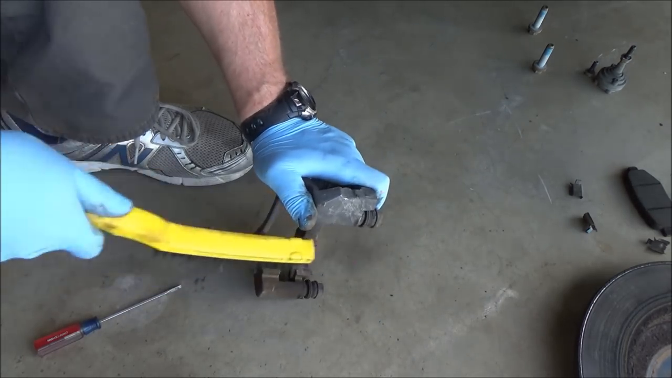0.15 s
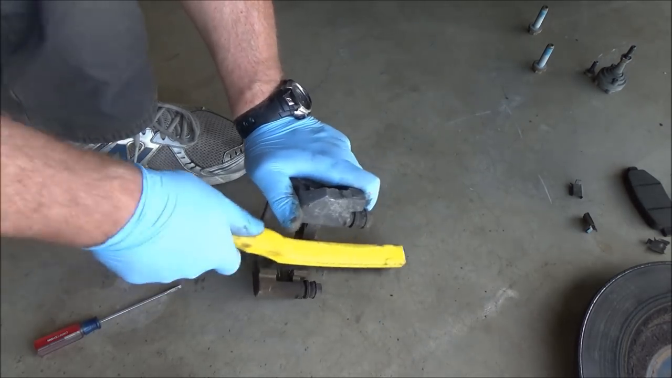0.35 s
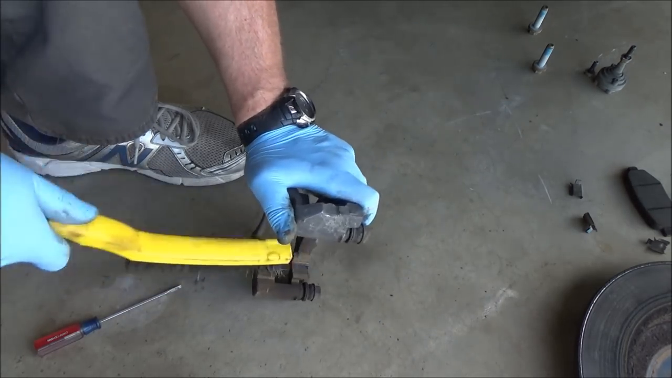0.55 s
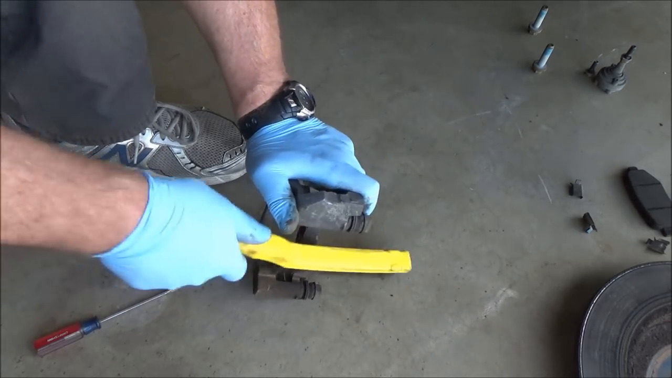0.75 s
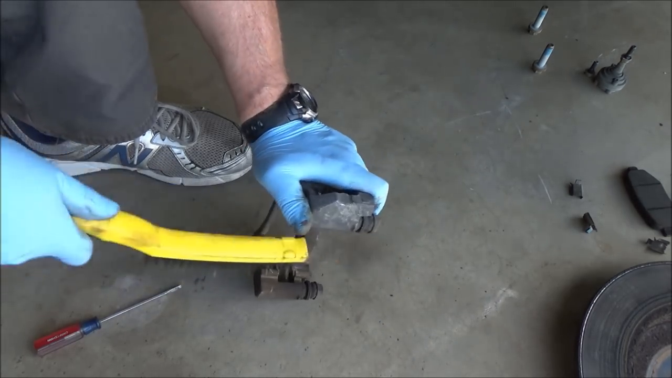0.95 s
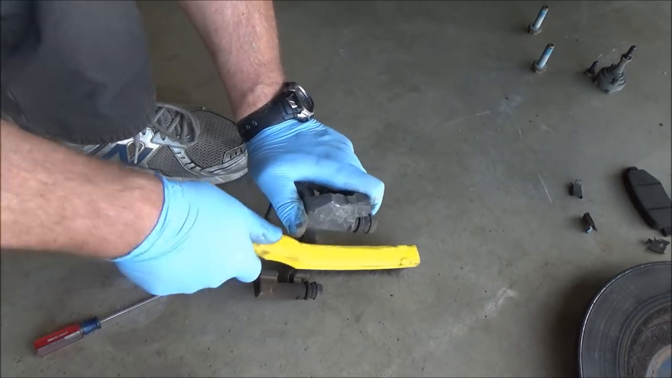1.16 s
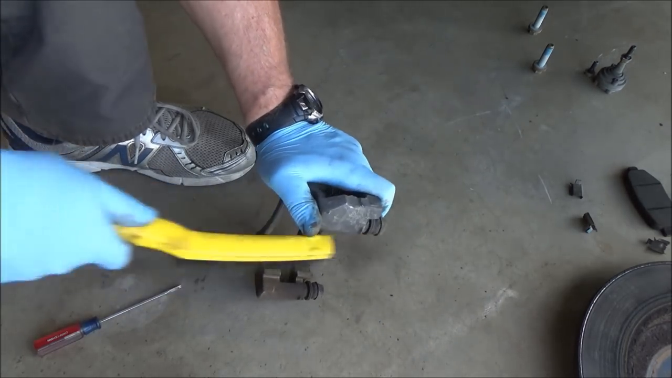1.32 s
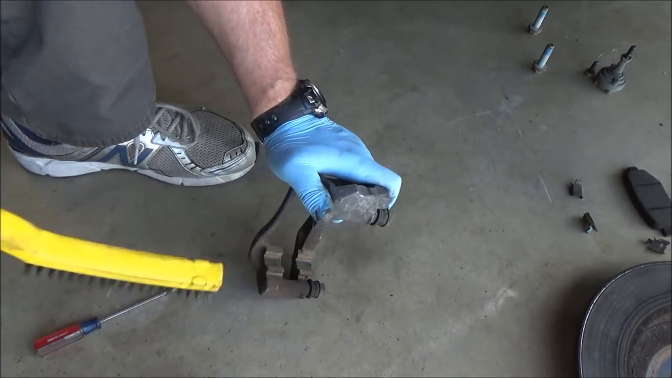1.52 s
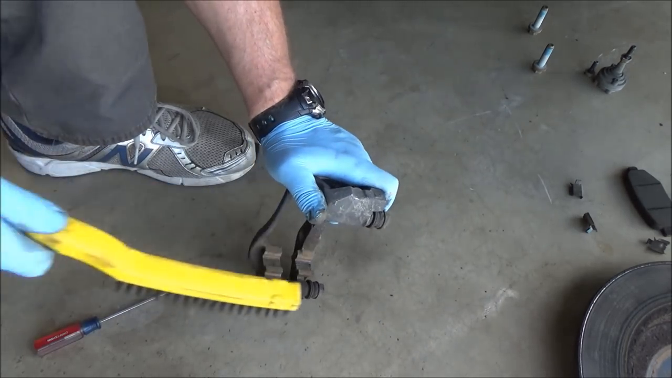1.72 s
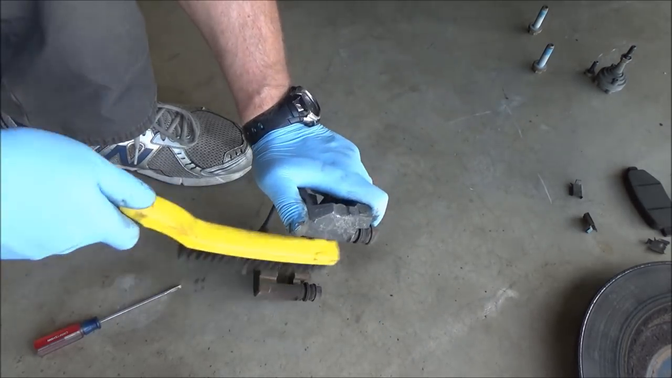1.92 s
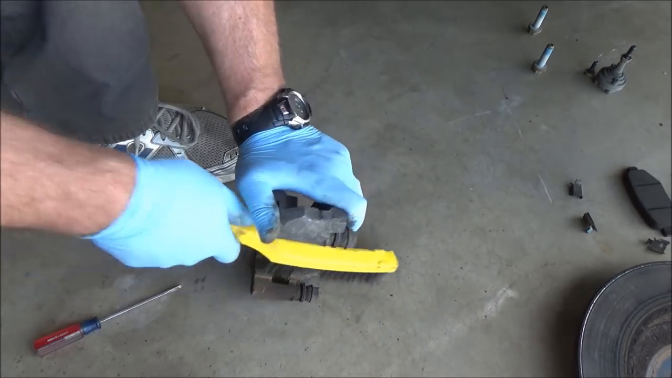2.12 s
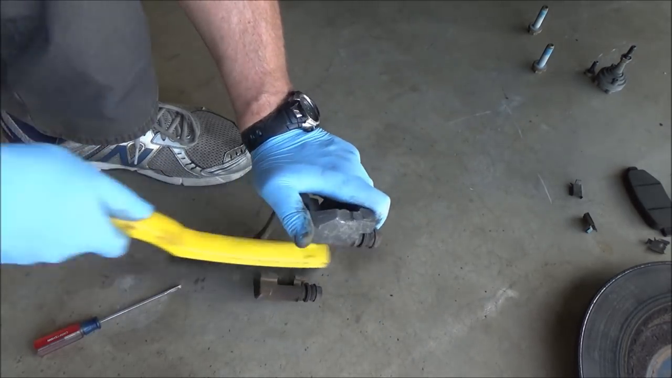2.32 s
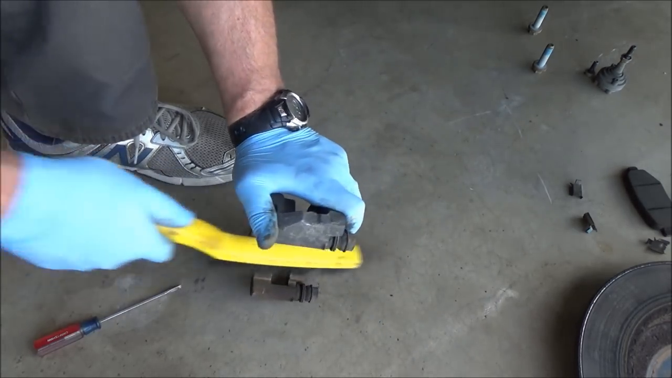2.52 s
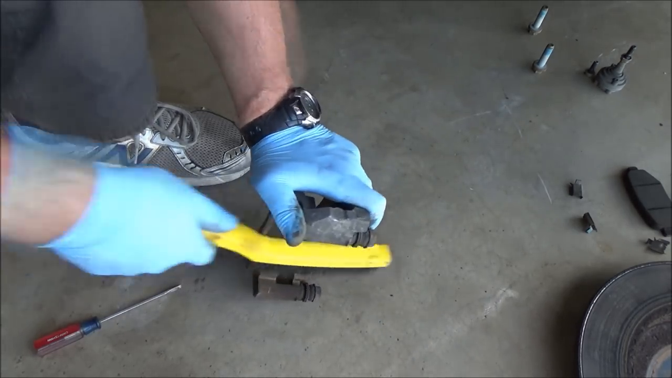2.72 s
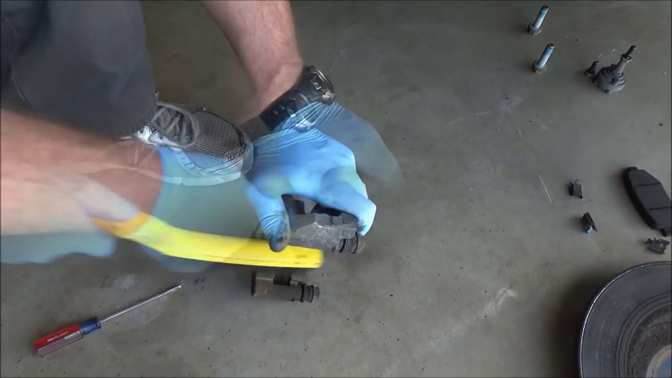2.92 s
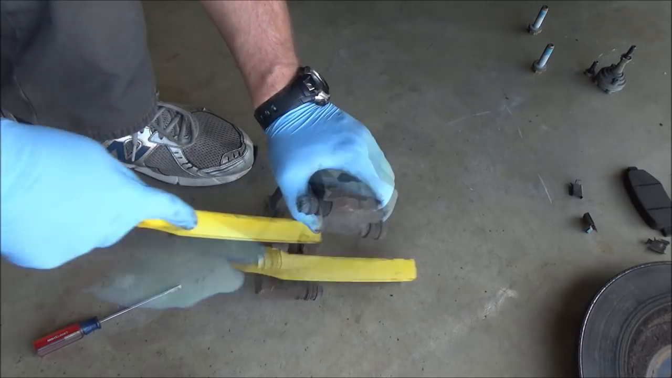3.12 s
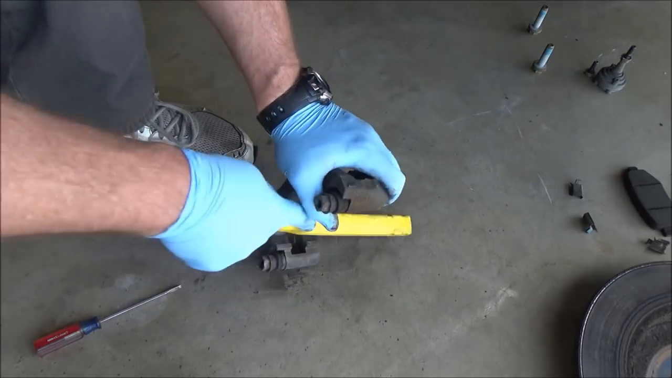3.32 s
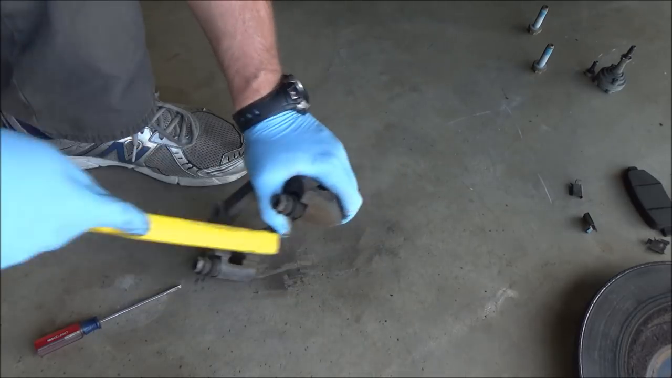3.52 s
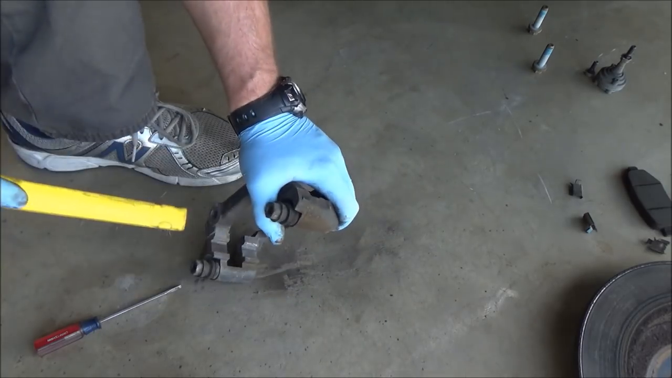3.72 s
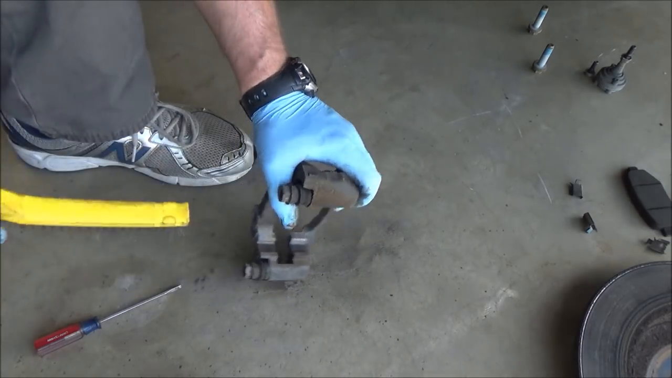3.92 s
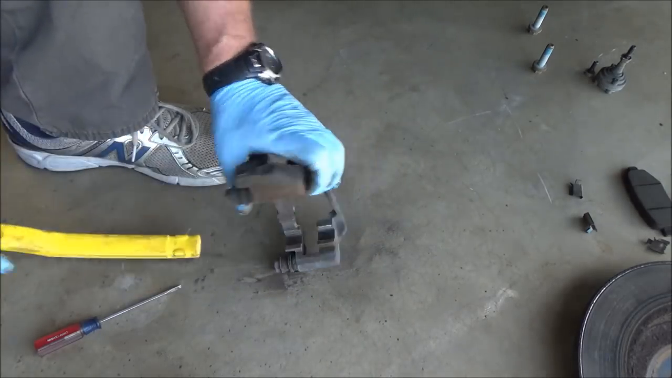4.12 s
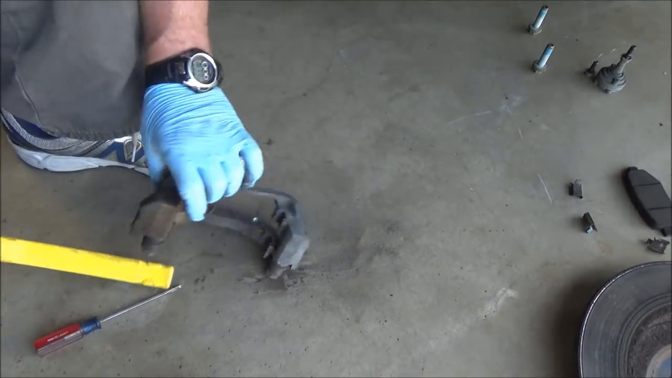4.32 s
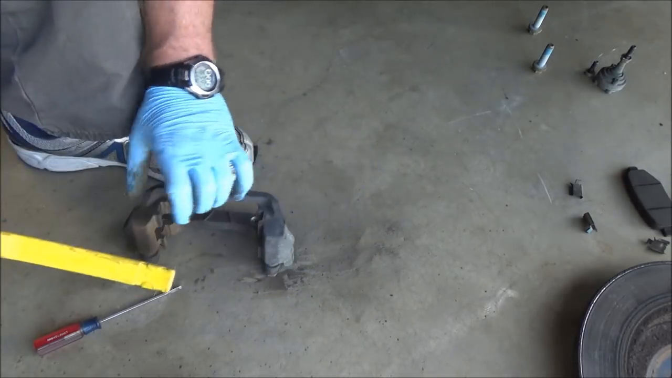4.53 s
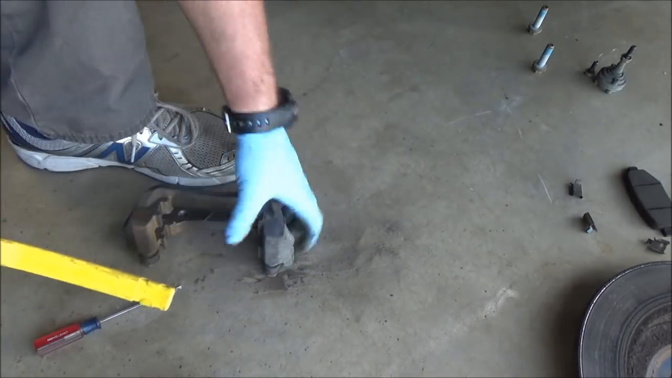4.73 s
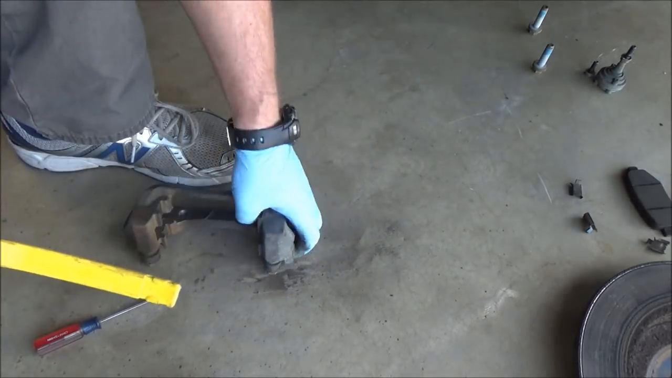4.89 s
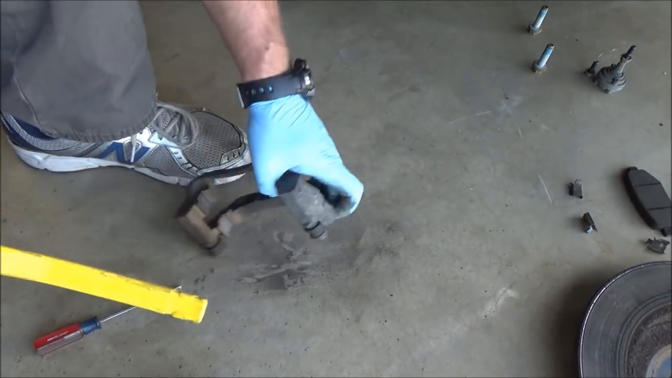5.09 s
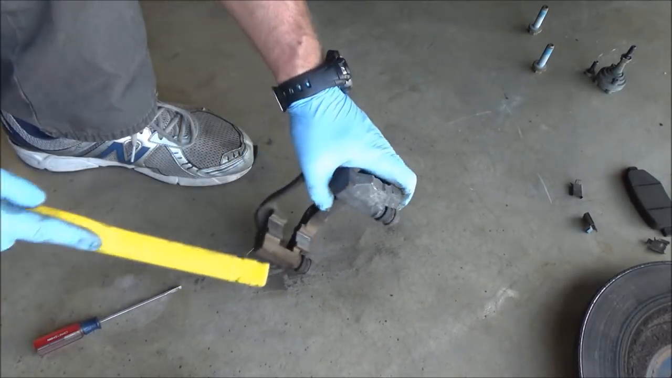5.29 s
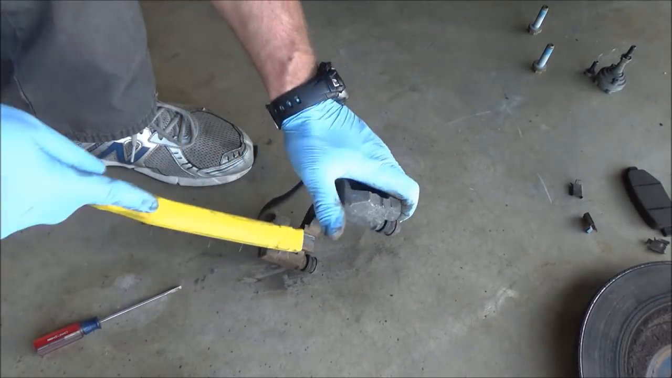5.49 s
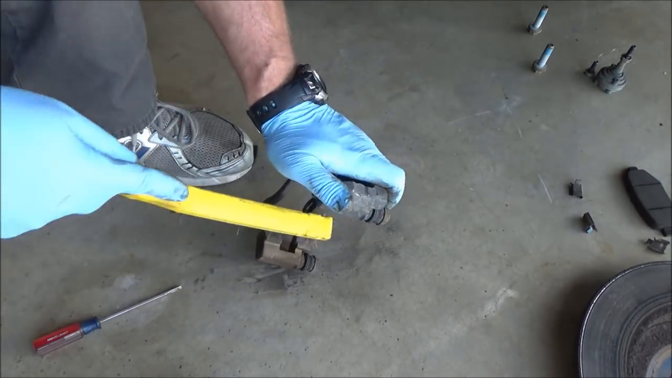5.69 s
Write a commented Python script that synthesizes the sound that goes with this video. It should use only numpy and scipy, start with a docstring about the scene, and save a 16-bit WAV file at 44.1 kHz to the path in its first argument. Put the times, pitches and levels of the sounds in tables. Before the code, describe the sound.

A wire brush scrubs a metal part in quick scratchy strokes, then the part clanks and scrapes on a concrete floor.

```python
"""A steel wire brush scrubs a rusty cast bracket, which rocks on a concrete garage floor in a gloved hand.
The wire tips catch on the rust and spring free, ringing. After a pause, more strokes start at 2 seconds.
From 3.7 seconds the bracket is dragged, laid over, regripped and stood up: iron clanks, grit ticks,
and the rubber glove rubs and squeaks. Near the end a faint cricket grows louder. It comes in through
the open door, along with the traffic that rumbles all the way through."""
import sys
import numpy as np
from scipy import signal
from scipy.fft import rfft, irfft, next_fast_len
from scipy.io import wavfile

SR = 44100
rng = np.random.default_rng(int(sys.argv[2]) if len(sys.argv) > 2 else 0)


def unload_wav(signal):
    """Save mono or channel-first audio to the path in sys.argv[1] as 16-bit WAV at rate SR, clipped to [-1, 1]."""
    wavfile.write(
        sys.argv[1],
        SR,
        np.round(np.clip(np.atleast_2d(signal).T, -1, 1) * 32767).astype(np.int16),
    )


N = 253575

# Brush strokes, pull and push by turns. Each row: start and end in seconds, level in dB once biting,
# before letting go and at the turn, then the middle ring and the rasp in dB above that level.
STROKES = [(0.0, 0.218, -25, -25, -38.5, -7.5, -17), (0.215, 0.406, -22.5, -25.5, -33, -6.5, -16),
           (0.403, 0.607, -24.5, -26, -41.5, -7, -18), (0.599, 0.802, -23.5, -25, -38, -5.5, -17),
           (0.808, .99, -24, -25, -40.5, -6, -17), (0.985, 1.201, -24.5, -23.5, -38.5, -6, -16.5),
           (1.226, 1.473, -24, -27, -48, -5, -15.5), (2.02, 2.231, -25, -25.5, -37.5, -5.5, -12.5),
           (2.236, 2.457, -23.5, -21.5, -30.5, -5.5, -16.5), (2.472, 2.695, -20.5, -21.5, -33, -6.5, -17),
           (2.7, 2.918, -21.5, -21, -35, -5.5, -16), (2.914, 3.126, -20, -22, -31, -5, -16),
           (3.124, 3.357, -22, -21.5, -29, -6, -16.5), (3.361, 3.68, -23, -29.5, -44.5, -5, -15)]
# The brush is set down on the iron. Each row: time in seconds, level in dB.
TOUCHDOWNS = [(1.958, -31.5), (1.991, -25)]
# The broad scratch of the wire tips. Each row: frequency in Hz, relative level in dB.
SCRATCH_SPECTRUM = [(150, -47), (350, -2), (700, -2), (1500, -32), (3700, 2), (6500, 11.5), (8200, 4),
                    (11500, -10), (13500, -56), (16000, -27)]
# The bracket's natural tones. Each row: pitch in Hz, relative level in dB, base ring time in seconds.
BRACKET_TONES = [(362, 12, 0.12), (929, -0.5, .25), (1330, -6, 0.15), (650, 0, .14), (685, -6, .1),
                 (1480, 0, .14), (2792, 0, .33), (6374, 3, .3), (2265, -21, .2), (3250, -18, .3),
                 (3845, -11, .2), (4190, 0, .04), (5060, -11, .25), (5360, -13, .4), (7350, -4, .3),
                 (8445, 0, .16), (8726, -8, .5), (9820, -11, .15), (10660, -6, .12), (11200, -9, .4),
                 (12150, -18, .3)]
# The upright bracket rocks. Each row: time in seconds, level in dB, pitch struck hardest in Hz,
# thud in dB above that level.
ROCKS = [(0.023, -30.5, 680, 8.5), (0.0238, -33, 1470, 2), (0.6045, -25.5, 1480, 5),
         (0.892, -34.5, 640, -14), (0.912, -35.5, 649, -14), (1.392, -35.5, 650, -10),
         (1.411, -34.5, 644, -4), (1.992, -39.5, 650, -3), (2.012, -40, 650, -3), (2.1106, -40, 1460, -2),
         (2.397, -29.5, 1680, 11.5), (2.4578, -30.5, 1250, 9.5), (2.9397, -38, 1510, -3),
         (4.987, -35, 480, 9.5)]
# The bracket hits the concrete. Each row: time in seconds, crack level in dB, crack pitch in Hz,
# four ring levels in dB from low tones to high, freedom to ring from 0 to 1.
BLOWS = [(3.732, -13, 1340, -61, -31, -41, -40, 0.64), (4.015, -18, 910, -21.5, -34, -42, -43, 0.3),
         (4.033, -17.5, 2940, -27, -37, -40, -45, 0.3), (4.1, -22.5, 2970, -56, -70, -52, -49, 0.91),
         (4.353, -13, 1400, -23, -26, -22, -49, 0.32), (4.389, -14, 4070, -36, -24.5, -27, -62, 0.17),
         (4.417, -15, 3400, -51, -27, -33, -69, 0.41), (4.454, -13, 4450, -71, -23, -19, -36, 0.84),
         (4.525, -13.5, 3520, -36, -26, -23.5, -43, 0.55), (5.205, -31, 5460, -38, -48, -53, -51, 0.54),
         (5.233, -33, 979, -38, -56, -59, -55, 0.31), (5.267, -24, 5100, -39.5, -47, -55, -61, 0.7),
         (5.402, -29.5, 4740, -65, -70, -39, -70, 0.18), (5.518, -26, 3450, -69, -75, -51, -63, 0.63),
         (5.556, -27, 4950, -64, -66, -81, -38.5, 0.41)]
# The bracket or glove slides. Each row: start, peak and end in seconds, peak level in dB, rise and fall
# in dB, then squeak, treble, bass and hum in dB above the level. A row ending before its start is mute.
SLIDES = [(3.733, 3.813, 3.829, -39, 7.5, -2.5, 7.5, 11.5, -6.5, -3),
          (4.021, 4.035, 4.064, -50.5, 10, 10, 0, 13.5, 11, -15),
          (4.17, 4.33, 4.345, -49, 7.5, -3, 0, 7.5, -15, -19),
          (4.346, 4.48, 4.555, -41, 7, 3, -27, -7.5, 2.5, -7),
          (4.66, 4.758, 4.77, -46.5, 20.5, 6, 5.5, 5, -8, -14),
          (4.77, 4.964, 5.2, -46, 5.5, 11, 1.5, 1, -8, -4), (5.191, 5.25, 5.34, -54, -1, 0, 2, 3.5, 2, -24),
          (5.41, 5.45, 5.49, -52.5, 17, 0, -10, 4, -15, -12),
          (5.515, 5.555, 5.45, -50, 3, 9, 16, 29, -6, -8)]
# The tone of that rubbing. Each row: frequency in Hz, relative level in dB.
RUB_SPECTRUM = [(500, 0.5), (1800, 4.5), (4500, 9), (7000, -6.5), (9800, -2.5), (12000, -14), (15500, -10)]
# The bracket's foot grinds on the floor. Each row: time in seconds, level in dB.
GRIND_LEVELS = [(3.37, -62), (3.442, -45.5), (3.554, -43.5), (3.66, -66)]
# Ticks of grit, glove and light bracket taps. Each row: time in seconds, level in dB, pitch in Hz.
TICKS = [(0.4, -11, 9450), (1.21, -14, 9400), (3.6457, -10.5, 8000), (3.8206, -8, 8700),
         (4.1342, -28, 3740), (4.2582, -25, 4240), (4.3444, -36, 3000), (4.437, -34, 4900),
         (4.4958, -15, 4150), (4.5493, -7.5, 3250), (4.899, -27.5, 6080), (5.0444, -39, 5100),
         (5.127, -28.5, 5390), (5.2065, -9, 11400), (5.306, -20, 10200), (5.3196, -25, 9730),
         (5.3373, -25.5, 10000), (5.445, -25.5, 8950), (5.4668, -32, 8400), (5.6999, -46, 7290)]
# The tone of the traffic. Each row: frequency in Hz, relative level in dB.
TRAFFIC_SPECTRUM = [(15, -1), (25, -14), (120, -2.5), (170, -5.5), (256, -6), (301, -7.5), (624, -9.5),
                    (754, -13), (1290, -19), (1480, -20), (1650, -20), (11000, -30), (16000, -36)]
# How loud the traffic and the cricket are. Each row: time in seconds, level in dB.
TRAFFIC_LEVELS = [(0.0, -52), (1.15, -52), (1.68, -52), (1.94, -51), (3.76, -47.5), (5.56, -50.5),
                  (5.75, -53)]
CRICKET_LEVELS = [(0, -76), (4.9, -72), (5.2, -60), (5.75, -58)]
# The sound leans left. Each row: frequency in Hz, left in dB above right.
LEFT_LEAN = [(200, 0), (600, .9), (2400, .3), (5500, 1.2), (9000, .4), (14000, .1)]
# Stereo width. Each row: frequency in Hz, smeared copy in dB above the centre sound.
STEREO_WIDTH = [(60, -42.5), (130, -33), (290, -28.5), (640, -14), (1410, -17), (3100, -22.5),
                (6820, -10.5), (15000, -33)]

# Ways the wires bend and ring, then rubber skidding on iron. Each: pitch in Hz, spread in octaves,
# cycles of ringing.
WIRE_TOP, WIRE_MIDDLE = (9650, 0.065, 23), (4960, 0.18, 18.5)
WIRE_LOW, RASP = (3170, 0.12, 30), (1958, 0.16, 16)
SQUEAK = (5900, 0.075, 36)
# The contact walks along the tufts, so the pitch sweeps. Each: place at start, bite, letting go and end.
PULL_SWEEP, PUSH_SWEEP = (0.22, -0.055, -0.26, 0.24), (-0.52, -0.63, 0.89, 0.22)
DWELL_S, BITE_S, LET_GO_S = 0.012, 0.039, 0.054   # the wires hang, load up, and unload before the turn
GRIP_S = .085   # the hand or the floor damps a blow's ring after this long
CHATTER_DB, CHATTER_PER_S = 3.5, 140   # a ringing bracket chatters on the floor, so each tone wavers
GARAGE_RING_S, WALL_CUT_HZ = 1, 6200


def brush():
    """Wire tips catch on the rust and spring free; these slips also set the bracket humming."""
    gain, middle_gain, rasp_gain, place = brush_pressure()
    slips = grains(per_s=9000, spread_db=2.8)
    hum = bracket_hum(slips, freedom=0.47)
    top = tufts(slips, WIRE_TOP, 0.96 * place)
    scratch = amp(-12) * colour(slips, SCRATCH_SPECTRUM)
    middle = tufts(slips, WIRE_MIDDLE, place, focus_db=2.5) + amp(-7.5) * tufts(slips, WIRE_LOW)
    rasp = tufts(slips, RASP, place, focus_db=6.5)
    return gain * (top + scratch + amp(-23) * hum + middle_gain * middle + rasp_gain * rasp)


def brush_pressure():
    """Follow the hand: gains for the whole brush, its middle ring and its rasp, and the contact place."""
    curves, last_end, last_db = [], -1, 0
    for k, (start, end, bite_db, late_db, end_db, middle_db, rasp_db) in enumerate(STROKES):
        pushing = k % 2
        at_start, at_bite, at_release, at_end = PUSH_SWEEP if pushing else PULL_SWEEP
        joined = start - last_end < .04   # this stroke carries on from the last
        first_db = last_db if joined else bite_db - 8.5
        turn = (middle_db + 1, rasp_db + 2.5)   # the lower rings stand out at the turn
        bite, release = start + BITE_S, end - LET_GO_S
        swell_db = (bite_db + late_db) / 2 + 0.5   # the ring swells at full speed, mid-stroke
        curves.append([
            (min(start, last_end) if joined else start, first_db, *turn, at_start),
            (start + DWELL_S, first_db + 1.5, *turn, at_start),
            (bite, bite_db, middle_db, rasp_db, at_bite),
            ((bite + release) / 2, swell_db, middle_db - 1.75, rasp_db - 0.5, (at_bite + at_release) / 2),
            (release, late_db, middle_db - 2.5, rasp_db + (1 if pushing else -2), at_release),
            (end, end_db, *turn, at_end)])
        last_end, last_db = end, end_db
    for time, db in TOUCHDOWNS:
        tap = [(time - 0.0027, db - 30), (time, db), (time + 0.028, db - 18)]
        curves.insert(0, [(*point, -1.5, -18.5, 0) for point in tap])
    *levels_db, place = in_time(curves)
    return *amp(levels_db), np.clip(place, -2, 2)


def tufts(slips, tone, place=0, focus_db=0.7, count=14):
    """Each slip plucks one tuft. Tufts differ in length and pitch; those near the contact ring most."""
    hz, octaves, cycles = tone
    plucked = rng.integers(0, count, N)
    spots = np.linspace(-1.6, 1.6, count)
    turns = np.arange(0, N + SR // 16, SR // 16)   # the tufts take turns bearing the load
    uneven_db = [np.interp(np.arange(N), turns, rng.normal(0, 6, len(turns))) for _ in spots]
    load = amp(uneven_db - focus_db * (spots[:, None] - place) ** 2)
    load = load / np.sqrt(np.mean(load ** 2, axis=0))
    rings = sum(ring(slips * (plucked == k) * load[k], hz * 2 ** (octaves * spot), cycles / hz)
                for k, spot in enumerate(spots))
    return band(rings, hz * 0.44, min(hz * 3.24, SR / 2.1))


def bracket_knocks():
    """Iron meets concrete: rocking rings the tones near one pitch; blows crack, ring widely and thud."""
    out, hz = np.zeros(N), np.array(BRACKET_TONES)[:, 0]
    for time, db, struck_hz, thud_db in ROCKS:
        octaves_away = np.abs(np.log2(hz / struck_hz))
        clank = bracket_ring(db - 39 * octaves_away, freedom=0.76, free_s=1)
        thud = amp(db + thud_db) * crack(0.91 * struck_hz, ring_s=0.032, octaves=1.0)
        add(out, time, clank + thud)
    next_times = [row[0] for row in BLOWS[1:]] + [np.inf]
    for (time, db, crack_hz, *ring_db, freedom), next_time in zip(BLOWS, next_times):
        levels_db = at_hz([(650, ring_db[0] - 35), *zip([1000, 1470, 2930, 7300], ring_db)], hz)
        levels_db += rng.normal(0, 0.6, len(hz))   # each contact point favours other tones
        add(out, time, bracket_ring(levels_db, freedom, free_s=min(next_time - time, GRIP_S)))
        add(out, time, amp(db) * crack(crack_hz, ring_s=0.021, octaves=0.6))
        thud_db = db - 7.5 - 10.5 * np.log2(crack_hz / 1000)   # the iron's weight; less if bright
        add(out, time, amp(thud_db) * crack(480, ring_s=0.036, octaves=0.48))
    return out


def bracket_ring(levels_db, freedom, free_s):
    """The struck bracket rings in all its tones until the hand or the next contact chokes it."""
    hz, db, ring_s = np.transpose(BRACKET_TONES)[:, :, None]
    t = np.arange(SR // 2) / SR
    choke_db = np.maximum(t - free_s, 0) * 900
    fade_db = -60 * t / (ring_s * freedom) - choke_db
    steps = np.arange(0, .51, 1 / CHATTER_PER_S)
    waver_db = [np.interp(t, steps, rng.normal(0, CHATTER_DB, len(steps))) for _ in hz]
    loudness = amp(db + levels_db[:, None] + fade_db + waver_db)
    return np.sum(loudness * np.sin(2 * np.pi * hz * t), axis=0)


def bracket_hum(clicks, freedom):
    """A stream of tiny clicks keeps the bracket's higher tones ringing."""
    return rms_one(sum(amp(db) * ring(clicks, hz, freedom * ring_s)
                       for hz, db, ring_s in BRACKET_TONES[5:]))


def handling():
    """Grit grinds under the bracket and the rubber glove skids on the iron."""
    grit = grains(per_s=9000, spread_db=1.66)
    rub = colour(grit, RUB_SPECTRUM)
    middle, treble, bass = band(rub, 2250, 6300), band(rub, 6700, 12700), band(rub, 360, 1440)
    squeak = tufts(grit, SQUEAK)
    layers = np.array([squeak, treble, bass, bracket_hum(grit, freedom=0.27)])
    out = gain_curve(GRIND_LEVELS) * band(ring(grit, 329, 0.038), 343, 620)
    for start, peak, end, db, rise_db, fall_db, *layers_db in SLIDES:
        first_db, last_db = db - rise_db, db - fall_db
        # Contact is made and broken quickly, in 8 milliseconds.
        shape = [(start - .008, first_db - 20), (start, first_db), (peak, db),
                 (end, last_db), (end + .008, last_db - 20)]
        out += gain_curve(shape) * (middle + amp(layers_db) @ layers)
    return out


def ticks():
    """Short, sharp cracks of grit, glove and light bracket taps that leave the ringing undamped."""
    out = np.zeros(N)
    for time, db, hz in TICKS:
        add(out, time, amp(db) * crack(hz, ring_s=0.0081, octaves=0.24))
    return out


def traffic():
    """Traffic rumbles outside, with a low drone in it and a hiss above."""
    drone = amp(-10) * band(ring(rng.standard_normal(N), hz=123.9, ring_s=0.41), 132, 178)
    rumble = colour(rng.standard_normal(N), TRAFFIC_SPECTRUM)
    return gain_curve(TRAFFIC_LEVELS) * (rumble + drone)


def cricket(hz=2750, pulses_per_s=29.5):
    """A cricket pulses quickly on one pitch."""
    t = np.arange(N) / SR
    pulses = np.maximum(np.cos(2 * np.pi * pulses_per_s * (t - 5.624)), 0) ** 3.4
    return gain_curve(CRICKET_LEVELS) * pulses * np.sin(2 * np.pi * hz * t)


def garage(x):
    """Ten echoes bounce between the walls, quieter and duller on every round."""
    size = next_fast_len(N + SR)
    hz = np.arange(size // 2 + 1) * SR / size
    dull = 1 / (1 + 1j * hz / WALL_CUT_HZ) ** 0.45
    trips = [amp(-60 * delay_s / GARAGE_RING_S) * dull * np.exp(-2j * np.pi * hz * delay_s)
             for delay_s in rng.uniform(.015, .05, 10)]
    return irfft(rfft(x, size) * sum(trip / (1 - trip) for trip in trips), size)[:N]


def microphones(centre):
    """Two close microphones differ by a lean to the left plus a smeared copy of the sound."""
    size = next_fast_len(N + 4000)
    hz = np.arange(size // 2 + 1) * SR / size + 1
    smear = rfft(rng.standard_normal(4000) * amp(-60 * np.arange(4000) / SR / 0.12), size)
    smear = smear / np.sqrt(np.mean(np.abs(smear) ** 2))
    lean = np.tanh(at_hz(LEFT_LEAN, hz) * np.log(10) / 40)
    side = irfft(rfft(centre, size) * (lean + smear * amp(at_hz(STEREO_WIDTH, hz))), size)[:N]
    return centre + side * [[1], [-1]]


def grains(per_s, spread_db, clump_db=1.5):
    """Random clicks of uneven size, in clumps a few milliseconds long."""
    clumps = np.tanh(band(rng.standard_normal(N), 19, 240) / 2) * 2
    sizes = amp(spread_db * np.minimum(rng.exponential(1, N), 3) + clump_db * clumps)
    return sizes * rng.choice([-1, 1], N) * (rng.random(N) < per_s / SR)


def crack(hz, ring_s, octaves):
    """A short burst of noise around a pitch, with a quieter, longer tail."""
    t = np.arange(SR // 2) / SR
    edges = np.clip(hz * 2.0 ** np.array([-octaves, octaves]), 50, SR / 2.1)
    burst = band(rng.standard_normal(len(t)), *edges)
    return .4 * burst * (amp(-60 * t / ring_s) + amp(-14 - 60 * t / (6 * ring_s)))


def ring(clicks, hz, ring_s):
    """Each click starts a pure tone that fades by 60 dB in ring_s seconds."""
    decay, angle = amp(-60 / (ring_s * SR)), 2 * np.pi * min(hz, SR / 2.2) / SR
    return signal.lfilter([0, np.sin(angle)], [1, -2 * decay * np.cos(angle), decay ** 2], clicks + 1e-18)


def colour(x, spectrum):
    """Shape a sound's lows and highs by a spectrum table, at strength 1."""
    size = next_fast_len(N)
    hz = np.arange(size // 2 + 1) * SR / size + 1
    return rms_one(irfft(rfft(x, size) * amp(at_hz(spectrum, hz)), size)[..., :N])


def band(x, low_hz, high_hz):
    """Keep what lies between two frequencies, at strength 1."""
    return rms_one(signal.sosfilt(signal.butter(2, [low_hz, high_hz], "band", fs=SR, output="sos"), x))


def in_time(curves):
    """Join rows of (seconds, values..) with straight lines; outside the curves every value is -90."""
    t = np.arange(N) / SR
    out = np.full((len(curves[0][0]) - 1, N), -90.0)
    for rows in curves:
        times, *columns = np.transpose(rows)
        inside = (t >= times[0]) & (t <= times[-1])
        out[:, inside] = [np.interp(t[inside], times, column) for column in columns]
    return out


def gain_curve(rows):
    return amp(in_time([rows])[0])


def at_hz(rows, hz):
    row_hz, row_db = np.transpose(rows)
    return np.interp(np.log(hz), np.log(row_hz), row_db)


def add(out, start_s, sound):
    at = round(start_s * SR)
    out[at:at + len(sound)] += sound[:N - at]


def amp(db):
    return 10 ** (np.asarray(db) / 20)


def rms_one(x):
    return x / np.sqrt(np.mean(x ** 2) + 1e-20)


def scene():
    """The work on the floor, its echo and the sounds from outside, in stereo."""
    scraping = brush() + ticks() + handling()
    knocks = bracket_knocks()
    echo = amp(-28) * garage(scraping + amp(-11) * knocks)   # knocks get less echo, so they sound drier
    return microphones(scraping + knocks + echo + traffic() + cricket())


def record(dry):
    """Round off the loudest peaks and cut the highest treble steeply."""
    rounded = .6 * np.tanh(dry / .6)
    return signal.sosfilt(signal.ellip(14, .5, 70, 15740, fs=SR, output="sos"), rounded)


dry = scene()
out = record(dry)
unload_wav(out)
```